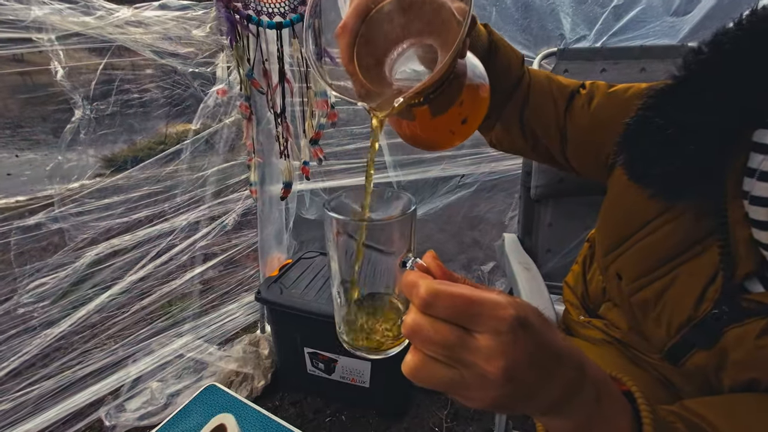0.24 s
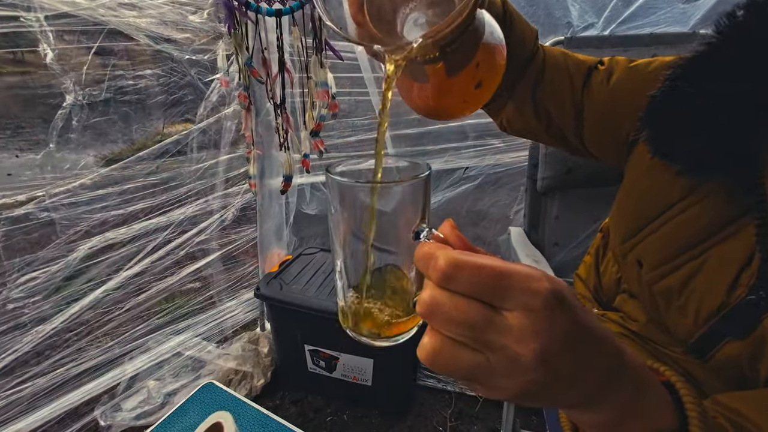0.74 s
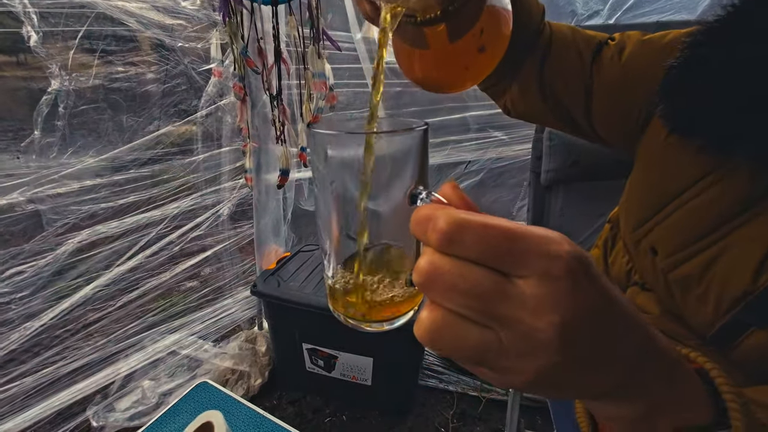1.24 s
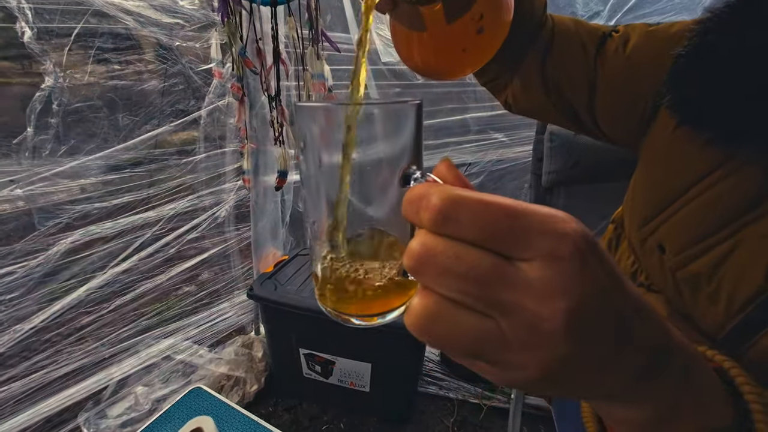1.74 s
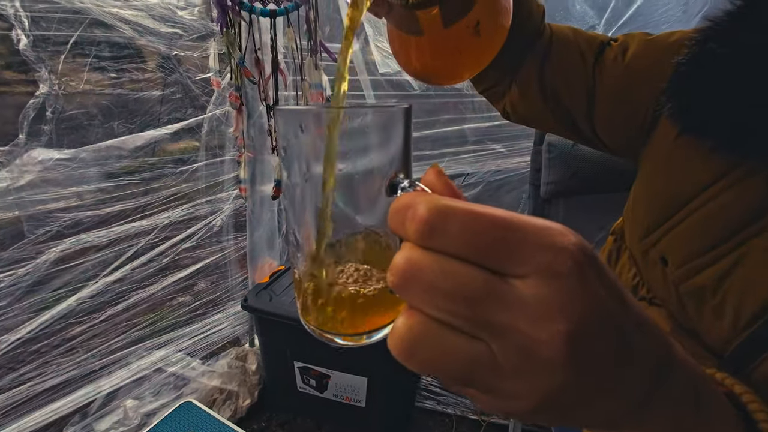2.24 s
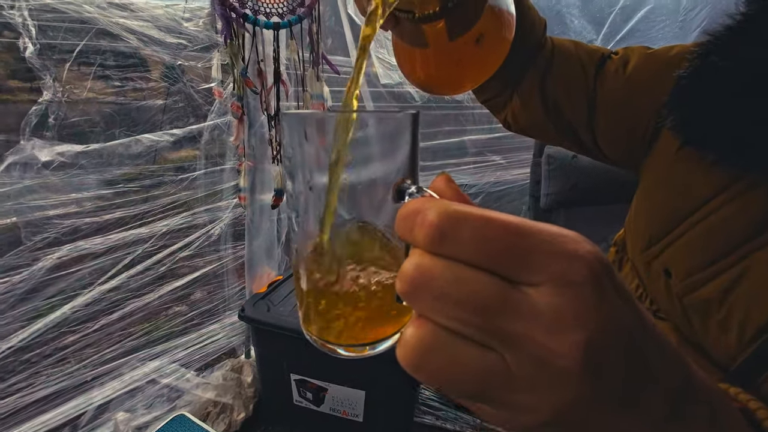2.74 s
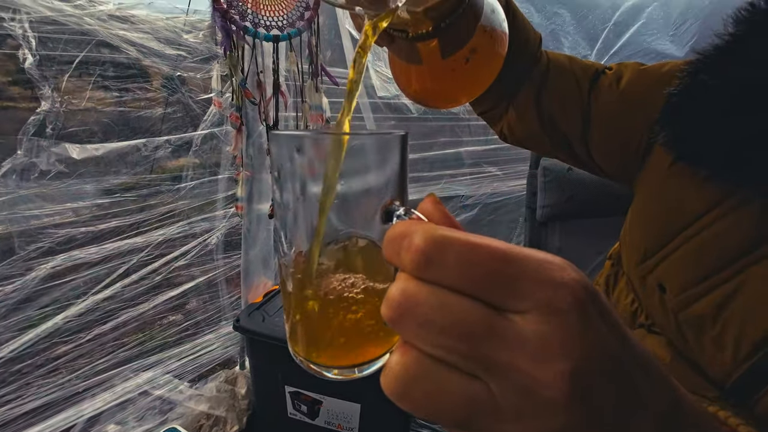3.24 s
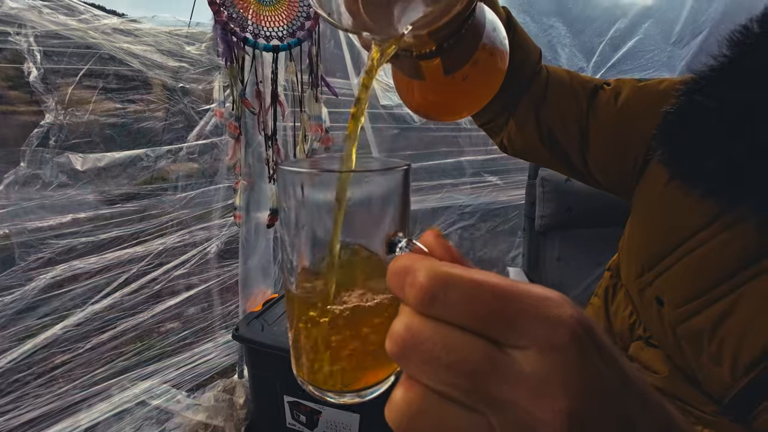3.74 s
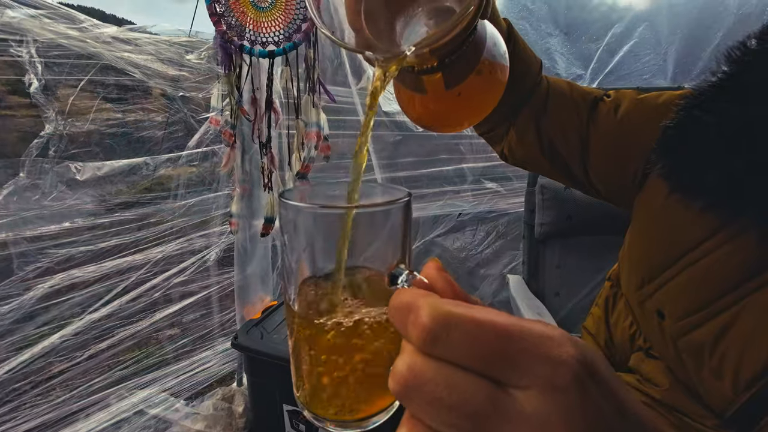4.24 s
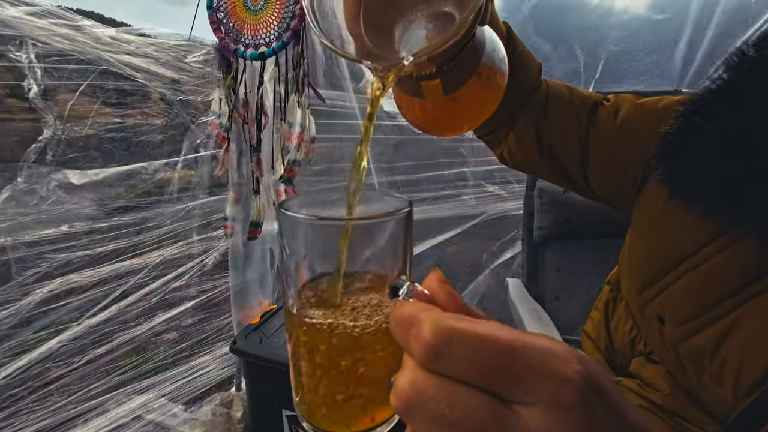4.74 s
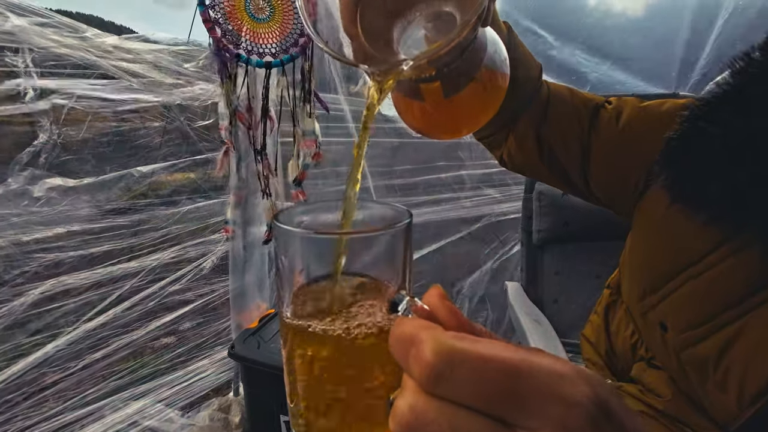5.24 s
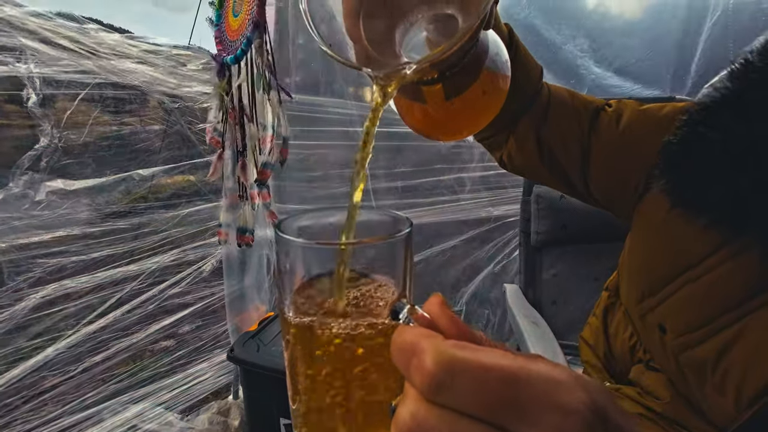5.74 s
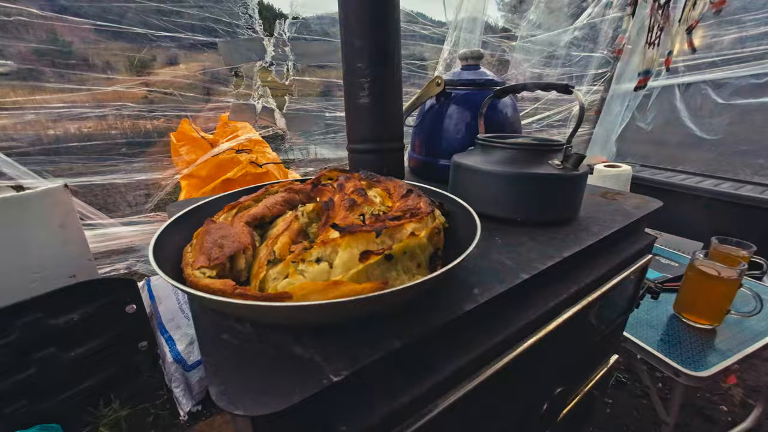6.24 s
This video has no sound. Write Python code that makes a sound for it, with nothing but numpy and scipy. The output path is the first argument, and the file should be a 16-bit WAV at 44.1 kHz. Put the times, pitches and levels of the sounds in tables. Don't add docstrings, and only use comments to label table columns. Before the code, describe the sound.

Close watery pouring into a tall glass mug, hollow tone climbing as it fills, under low wind buffeting and growing hiss from plastic sheeting.

```python
import sys
import numpy as np
from scipy import signal
from scipy.io import wavfile
from scipy.ndimage import uniform_filter1d

SR = 44100
rng = np.random.default_rng(int(sys.argv[2]) if len(sys.argv) > 2 else 0)


def gain_from_decibels(decibels):
    exponent = np.asarray(decibels, float) / 20
    return 10 ** exponent


def bounce(signal):
    frames = np.transpose(np.atleast_2d(signal))
    limited = np.clip(frames, -1, 1)
    pcm = np.round(limited * 32767).astype(np.int16)
    wavfile.write(sys.argv[1], SR, pcm)


N = 286209
CUT_S = 6.279

# time_s, level_db (under 60 Hz), buffet_db (above it, relative)
WIND = [(0.0, -34, -3), (0.05, -34, -4), (0.49, -31, -21), (0.76, -32, -2.5), (0.89, -29, -18),
        (1.17, -31.5, -6), (1.32, -32, -17), (1.57, -30, -18), (1.84, -30, -12.5), (2.53, -32, -17),
        (2.93, -30, -15), (3.03, -32, -14), (3.27, -32, -6), (3.42, -26, -18), (3.54, -34, -6),
        (3.61, -34.5, -18), (3.8, -28, -18), (3.87, -27, -16.5), (4.16, -37, -3.5), (4.54, -28, -5),
        (4.59, -34, -6), (4.83, -32, -11), (4.88, -29, -4), (5.08, -24, -3), (5.22, -41, -1),
        (5.37, -29.5, 2), (5.53, -41, -1), (5.6, -34, -8), (6.07, -34, -5), (6.49, -23, -19)]
# time_s, level_db, tilt_db_per_octave
CALM_HISS = [(0.0, -44.5, -1), (0.11, -42, -0.5), (0.82, -42.5, -1), (1.0, -42.5, 0), (1.23, -43.5, -0.5),
             (1.79, -45.5, -0.5), (1.92, -45, -1.5), (2.2, -41, -0.5), (2.37, -44.5, -0.5),
             (2.58, -47, -2.5), (2.9, -41.5, -0.5)]
# time_s, level_db, tilt_db_per_octave
GUSTY_HISS = [(2.95, -42.5, 0), (3.21, -33.5, 0), (3.62, -40.5, 0), (3.63, -34, 0), (3.64, -39, 0),
              (3.66, -31, 0), (3.67, -34.5, 0), (3.75, -38, 0), (3.77, -33, 0), (3.79, -36.5, 0),
              (3.91, -37.5, 0), (3.92, -34, 0), (3.94, -38, 0), (4.01, -34, 0), (4.16, -38.5, 0),
              (4.3, -34, 0), (4.37, -38, 0), (4.38, -32, 0), (4.46, -35, 0), (4.56, -30.5, 0.0048),
              (4.58, -24.5, 0.0095), (4.64, -31, 0), (4.96, -30, 0), (5.06, -34, 0), (5.07, -26.5, 0),
              (5.1, -35.5, 0), (5.13, -26.5, 0), (5.15, -31.5, 0), (5.29, -34, 0), (5.34, -30, 0.0049),
              (5.72, -34, 0), (5.76, -35, 0), (5.89, -35, 0), (6.03, -33, 0), (6.05, -30.5, 0),
              (6.08, -33, 0), (6.1, -28.5, 0), (6.18, -34, 0), (6.19, -32, 0), (6.27, -30, 0),
              (6.28, -47, 0), (6.29, -36, 0), (6.48, -34.5, 0.0048), (6.49, -31, 0)]
# freq_hz, level_db
HISS_COLOUR = [(88, -26), (150, -0.5), (275, -5), (770, -3), (1340, -4.5), (2080, -5), (4390, -8.5),
               (5440, -5.5), (6850, -12.5), (9610, -9.5), (10500, -15.5), (13600, -34), (22000, -120)]
# time_s, first_mode_hz, second_mode_hz
COLUMN = [(0, 744, 2170), (1, 807, 2440), (2, 845, 2455), (2.6, 910, 2590), (3.6, 1100, 3170),
          (4.5, 1150, 3500), (5.3, 1250, 3680), (6.3, 1480, 4200)]
# time_s, level_db
GURGLE = [(0.0, -44), (0.24, -46), (0.8, -54), (0.89, -41), (1.01, -28), (1.08, -39.5), (1.33, -41),
          (1.41, -37.5), (1.5, -32.5), (1.66, -38), (1.9, -47.5), (2.13, -34.5), (2.22, -30.5), (2.36, -41),
          (2.93, -40.5), (3.23, -46.5), (3.53, -53), (3.67, -30.5), (3.86, -37), (4.28, -38.5),
          (4.77, -30.5), (5.06, -40), (5.48, -37), (5.68, -39), (5.92, -43), (6.06, -35.5), (6.27, -40.5)]
# start_s, peak_db, pitch_hz, t60_cycles, second_mode_db
PLOPS = [(0.02, -15, 702, 42, -25), (0.495, -20.5, 803, 27, -11), (0.515, -13, 765, 32, -20),
         (0.541, -16.5, 810, 24, -5), (0.599, -22.5, 734, 31, 6), (0.854, -24, 807, 24, -3),
         (0.87, -12, 770, 31, -21), (0.91, -11, 825, 24, -26), (0.946, -13.5, 750, 30, -17),
         (0.982, -14, 756, 21, -21), (1.036, -16, 744, 27, -11), (1.057, -15.5, 794, 34, -24),
         (1.076, -9.5, 730, 16, -22), (1.114, -16.5, 820, 26, -15), (1.161, -27, 781, 21, -14),
         (1.18, -20.5, 675, 29, -20), (1.228, -12.5, 796, 20, -10.5), (1.258, -22, 825, 24, -26),
         (1.267, -17.5, 830, 24, -25), (1.308, -24, 795, 29, -10), (1.322, -12, 826, 27, -5),
         (1.356, -9.5, 810, 35, -21), (1.397, -7.5, 826, 28, -16), (1.474, -20, 583, 24, -21),
         (1.512, -28, 850, 22, -17), (1.531, -21, 689, 31, -9), (1.559, -14, 776, 18, -23),
         (1.561, -14, 870, 19, -19), (1.591, -15.5, 803, 20, -10), (1.718, -31, 830, 21, -6),
         (1.819, -32, 870, 22, -19), (1.873, -21, 894, 18, -13), (1.902, -16, 832, 35, -22),
         (1.995, -24, 840, 32, -15), (2.015, -17.5, 860, 26, -13), (2.058, -19.5, 820, 19, -6),
         (2.109, -26, 910, 24, -20), (2.158, -26, 910, 22, -16), (2.187, -16, 880, 16, -25),
         (2.215, -21, 840, 16, -20), (2.259, -21.5, 850, 24, -20), (2.318, -26, 960, 24, -11),
         (2.348, -22.5, 890, 19, -1), (2.389, -22, 893, 24, -24), (2.504, -39, 940, 24, -6),
         (2.545, -28, 875, 24, -2), (2.792, -32, 1120, 24, -15), (3.234, -28, 1090, 24, -12),
         (3.383, -26, 1040, 29, -18), (3.489, -22.5, 1056, 26, -17), (3.636, -22, 1060, 36, -14),
         (3.681, -20.5, 1056, 26, -22), (3.773, -32.5, 515, 21, -5), (3.773, -22, 1080, 24, -10),
         (3.803, -29, 1090, 24, -6), (3.822, -23, 1080, 24, -15), (3.916, -24.5, 1170, 30, -18),
         (4.022, -20.5, 1120, 33, -9), (4.143, -30, 1280, 24, -20), (4.17, -26, 1140, 21, -22),
         (4.205, -19.5, 1220, 22, -18), (4.289, -20.5, 1140, 22, -13), (4.364, -26, 1250, 26, -15),
         (4.432, -26, 1200, 24, -18), (4.456, -24, 1180, 24, -18), (4.554, -20, 1170, 24, -6),
         (4.642, -25, 1290, 24, -12), (4.686, -21, 1260, 26, -11), (4.713, -26, 1300, 24, -26),
         (4.748, -30, 1300, 24, -7), (4.798, -21, 1320, 24, -5), (4.895, -20, 1260, 24, -14),
         (4.919, -11, 1460, 21, -23), (4.955, -22, 1220, 24, -15), (4.994, -20, 1310, 27, -18),
         (5.248, -25, 1420, 22, -13), (5.306, -26, 1250, 22, -13), (5.32, -22, 1300, 21, -17),
         (5.573, -31, 1270, 24, -15), (5.837, -29, 1420, 26, -11), (5.864, -20, 1450, 22, -18),
         (5.885, -23, 1360, 18, -18), (5.964, -25.5, 1660, 24, -21), (6.194, -25, 1360, 24, -13),
         (6.242, -31, 1290, 24, -13)]
# start_s, peak_db, pitch_hz, bend_per_s
SMALL_BUBBLES = [(0.0378, -29.5, 2180, 8), (0.052, -27.5, 2060, 7.1), (0.0872, -30, 1500, 8.9),
                 (0.1017, -29, 1520, 8), (0.1251, -31, 2520, 8), (0.198, -20.5, 2130, 6.9),
                 (0.3706, -27.5, 2040, 6.3), (0.45, -18, 2140, 6.6), (0.5998, -21, 2260, 11),
                 (1.0344, -22, 2330, 7), (1.1412, -16.5, 2470, 8), (1.4584, -33, 2400, 8),
                 (1.615, -21, 2430, 7.3), (1.6696, -28.5, 2460, 8.7), (2.1944, -27.5, 1980, 8),
                 (2.224, -30.5, 2500, 7.3), (2.3482, -33.5, 2580, 8)]
# start_s, peak_db, pitch_hz, bend_per_s
BIG_BUBBLES = [
    (1.474, -25, 577, 4),
    (2.259, -19, 636, 4.4),
    (2.289, -41, 458, 3.8),
    (2.658, -27, 560, 4.5),
    (2.728, -35, 475, 5),
    (3.14, -30, 655, 4.3),
]
# start_s, peak_db, pitch_hz
TICKS = [(0.0355, -18.5, 7540), (0.078, -27, 5270), (0.119, -32, 5110), (0.1745, -35, 4800),
         (0.1742, -19.5, 5360), (0.2548, -28, 5160), (0.3334, -28, 5540), (0.4349, -31, 5200),
         (0.451, -19, 5350), (0.479, -17.5, 4870), (0.5232, -10, 5360), (0.6013, -25.5, 4420),
         (0.7941, -29, 3200), (0.7941, -25, 5200), (0.8071, -23.5, 7300), (0.8343, -15.5, 5170),
         (0.8696, -23, 6500), (0.9088, -25, 7500), (0.9218, -17, 4740), (0.945, -15, 4050),
         (0.9601, -5.5, 7550), (0.9817, -15.5, 4140), (1.0285, -26.5, 9680), (1.048, -21, 4150),
         (1.0763, -21, 9550), (1.115, -24, 7450), (1.1225, -20, 9600), (1.1413, -16, 3040),
         (1.1677, -30, 5750), (1.1857, -22, 4070), (1.1907, -22, 4200), (1.2282, -19, 8300),
         (1.287, -39, 3180), (1.288, -20, 7400), (1.3129, -23, 6860), (1.3129, -11, 7550),
         (1.342, -19, 5600), (1.3568, -17, 5500), (1.3942, -23, 3930), (1.436, -29, 6930),
         (1.4735, -30, 5840), (1.5299, -25.5, 5800), (1.6157, -22, 3240), (1.7996, -29, 6030),
         (1.8193, -28.5, 4000), (1.9794, -31, 5380), (2.0612, -29, 5100), (2.074, -20, 4900),
         (2.109, -21, 6760), (2.157, -28, 4030), (2.168, -23, 4000), (2.2114, -43, 3220),
         (2.2117, -21, 5200), (2.2588, -27, 5840), (2.2747, -27, 5570), (2.389, -20, 9900),
         (2.588, -34, 5360), (2.604, -32, 5050), (2.62, -27, 4850), (2.659, -26, 4070), (2.6985, -25, 5350),
         (2.7661, -27, 5180), (2.8686, -26, 9700), (2.89, -23.5, 5130), (2.937, -28.5, 9410),
         (3.1333, -24, 4080), (3.1712, -28, 4060), (3.1976, -25, 5230), (3.3528, -19.5, 4970),
         (3.627, -21, 5400), (3.6547, -13, 4060), (3.708, -22.5, 9800), (3.7653, -19, 4020),
         (3.8008, -25, 5200), (3.8521, -24, 5710), (3.8591, -25, 5240), (3.9165, -30, 4620),
         (3.9162, -19, 6200), (3.9599, -30, 5320), (3.9873, -28, 3440),
         (4.8694, -19, 5030),
    (4.919, -18, 9640),
    (5.0684, -20.5, 3690),
    (5.1238, -16.5, 9500),
    (5.9053, -19, 5100),
    (6.0477, -18, 5500),
    (6.1956, -23, 5120),
    (6.2076, -17, 9800),
    (6.254, -15.5, 5700),
]
THINNED = [.62, 1.6, 2.07, 3.29, 4.2, 4.758, 5.378, 5.44, 5.76, 6.017]
# freq_hz, gain_db
MICROPHONE = [(100, -2), (9700, 0), (10400, -3.5), (11200, -16.5), (12500, -28), (13500, -28), (15600, -12),
              (16200, -32)]


def evened(x):
    return x / np.sqrt(np.mean(x ** 2) + 1e-20)


def read(points, hz):
    point_hz, value = np.transpose(points)
    return np.interp(np.log(hz + 1), np.log(point_hz + 1), value)


def curve(rows, t_s):
    row_s, *columns = np.transpose(rows)
    return [np.interp(t_s, row_s, column) for column in columns]


def add(mix, start_s, sound):
    part = mix[max(round(start_s * SR), 0):][:len(sound)]
    part += sound[:len(part)]


def band(x, lo_hz, hi_hz):
    return signal.sosfilt(signal.butter(2, [lo_hz, hi_hz], "bandpass", fs=SR, output="sos"), x)


def resonate(x, hz, width_hz):
    turn = np.exp(2j * np.pi * np.cumsum(hz) / SR)
    pole = np.exp(-np.pi * width_hz / SR)
    smooth = signal.lfilter([1 - pole], [1, -pole], x / turn + 1e-18)
    return 2 * (turn * smooth).real


def impacts(per_s, spread_db):
    draw, size, sign = rng.random(N), rng.exponential(1, N), rng.standard_normal(N)
    return np.sign(sign) * gain_from_decibels(spread_db * np.minimum(size, 4)) * (draw < per_s / SR)


def ring(t_s, hz, t60_s, rise_s, bend_per_s):
    shape = (1 - np.exp(-t_s / rise_s)) * gain_from_decibels(-60 * t_s / t60_s)
    return shape / shape.max() * np.sin(2 * np.pi * hz * (t_s + bend_per_s * t_s ** 2))


def wind(t_s):
    level_db, buffet_db = curve(WIND, t_s)
    lumps = evened(band(rng.standard_normal(N), 10.7, 35.9))
    gusts = evened(band(rng.standard_normal(N), 4.9, 26))
    buffet = evened(band(rng.standard_normal(N), 52, 152) * gain_from_decibels(3.2 * gusts))
    return gain_from_decibels(level_db) * (gain_from_decibels(3.5) * lumps + gain_from_decibels(buffet_db - 2.5) * buffet)


def hiss():
    grains = evened(impacts(3000, 3.65)) + 1.318 * rng.standard_normal(N)
    hz, t_s, z = signal.stft(grains, SR, nperseg=256, noverlap=192)
    patches = rng.standard_normal(z.shape[::-1]).T
    patches = uniform_filter1d(patches, size=5, axis=0)
    patches = evened(uniform_filter1d(patches, size=12, axis=1))
    flicker = evened(uniform_filter1d(rng.standard_normal(len(t_s)), size=8))
    level_db, tilt_db = curve(CALM_HISS + GUSTY_HISS, t_s)
    octaves = np.log2((hz[:, None] + 100) / 4000)
    colour = gain_from_decibels(read(HISS_COLOUR, np.minimum(hz, 10000)))
    colour = colour / np.sqrt(np.mean(colour[hz > 1700] ** 2))
    gain_db = level_db + tilt_db * octaves + 1.66 * patches + 1.25 * flicker - 2.5
    z = z * colour[:, None] * gain_from_decibels(gain_db)
    return signal.istft(z, SR, nperseg=256, noverlap=192)[1][:N]


def gurgle(t_s):
    first_hz, second_hz = curve(COLUMN, t_s)
    level_db = curve(GURGLE, t_s)[0]
    drive = evened(impacts(260, 7.0)) + 0.34 * rng.standard_normal(N)
    sharp = resonate(resonate(drive, first_hz, 148), first_hz, 590)
    broad = resonate(resonate(drive, first_hz, 330), first_hz, 680)
    short = np.clip((first_hz - 800) / 450, 0, 1)
    first = (1 - short) * evened(sharp) + short * evened(broad)
    second = gain_from_decibels(-8 - 4.7 * short) * evened(resonate(drive, second_hz, 150))
    return gain_from_decibels(level_db - 1.5) * (first + second) * (t_s < CUT_S)


def plops():
    out, t_s = np.zeros(N), np.arange(round(0.1 * SR)) / SR
    for start_s, db, hz, cycles, second_db in PLOPS:
        bubble = ring(t_s, hz, np.clip(cycles, 6, 60) / hz, 0.0011, 1.7)
        second_hz = curve(COLUMN, start_s)[1]
        column = gain_from_decibels(second_db) * ring(t_s, second_hz, 0.017, 0.00035, 0)
        add(out, start_s, gain_from_decibels(db) * (bubble + column))
    for start_s, db, hz, bend_per_s in SMALL_BUBBLES + BIG_BUBBLES:
        add(out, start_s, gain_from_decibels(db - 0.5) * ring(t_s, hz, 30 / hz, 0.00041, bend_per_s))
    return out


def ticks():
    out, t_s = np.zeros(N), np.arange(600) / SR
    events = TICKS
    spray = band(rng.standard_normal((len(events), len(t_s))), 3800, 10500)
    spray_shape = (1 - np.exp(-t_s / 0.00037)) * gain_from_decibels(-60 * t_s / 0.009)
    for (start_s, db, hz), puff in zip(events, spray):
        snap = ring(t_s, hz, 0.0048, 0.000068, 2.3) + gain_from_decibels(3.0) * puff * spray_shape
        add(out, start_s, gain_from_decibels(db + 1.0) * snap)
    return out


def shelter(x):
    taps, t_s = np.zeros(4000), np.arange(4000) / SR
    taps[np.arange(100, 3980, 20) + rng.integers(0, 20, 194)] = rng.choice([-1., 1.], 194)
    taps *= gain_from_decibels(-60 * t_s / 0.093)
    return signal.oaconvolve(x, taps / np.linalg.norm(taps))[:N]


def scene():
    t_s = np.arange(N) / SR
    mug = gurgle(t_s) + plops() + ticks()
    mug = mug + gain_from_decibels(-16) * shelter(mug)
    dip = 1 - 0.9 * np.exp(-((t_s - CUT_S) / 0.003) ** 2)
    return ((wind(t_s) + hiss() + mug) * dip)[None]


def low_pass(x):
    return signal.sosfilt(signal.butter(12, 17090, fs=SR, output="sos"), x)


def record(dry):
    hz, t_s, z = signal.stft(dry[0], SR, nperseg=512, noverlap=448)
    band_of_bin = np.minimum(np.sqrt(hz * 0.12).astype(int), 39)
    thinned = (rng.random((len(THINNED), 40)) < 0.7)[:, band_of_bin]
    for time_s, bins in zip(THINNED, thinned):
        moment = np.exp(-((t_s - time_s) / 0.01) ** 2)
        z = z * gain_from_decibels(-18 * np.outer(bins * (hz > 1500), moment))
    z = z * gain_from_decibels(read(MICROPHONE, hz))[:, None]
    mix = signal.istft(z, SR, nperseg=512, noverlap=448)[1][None, :N]
    return low_pass(mix)


dry = scene()
out = record(dry)
bounce(out)
```